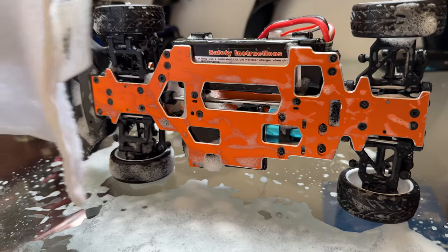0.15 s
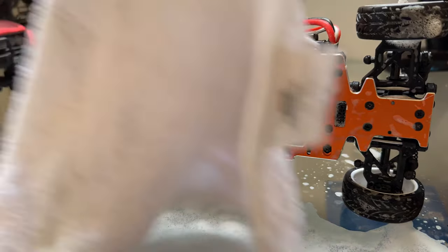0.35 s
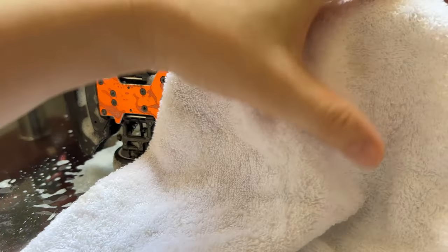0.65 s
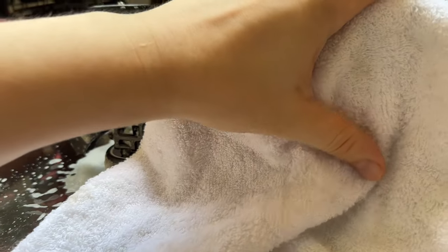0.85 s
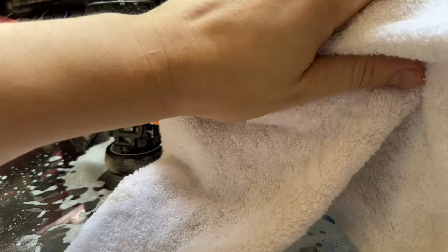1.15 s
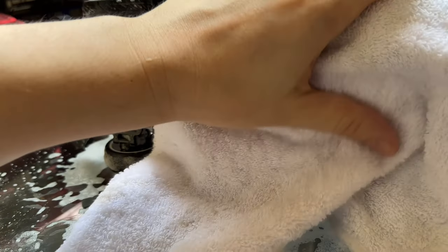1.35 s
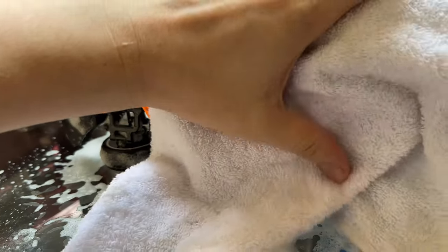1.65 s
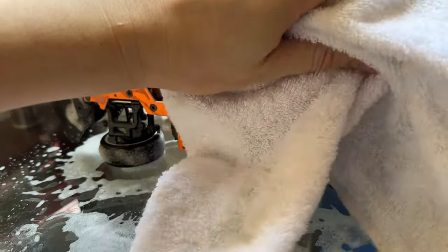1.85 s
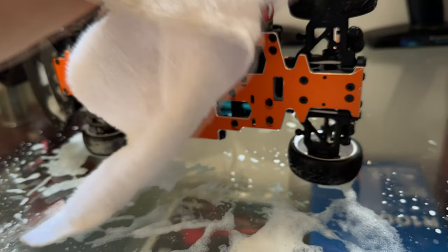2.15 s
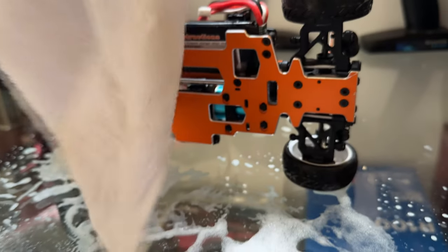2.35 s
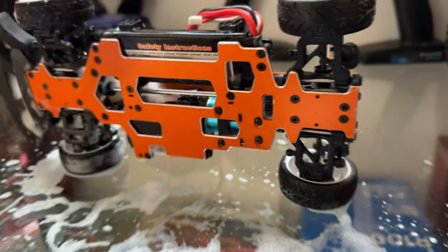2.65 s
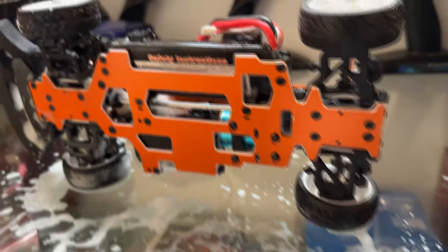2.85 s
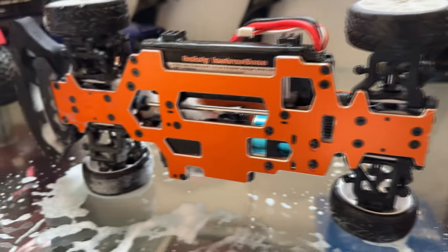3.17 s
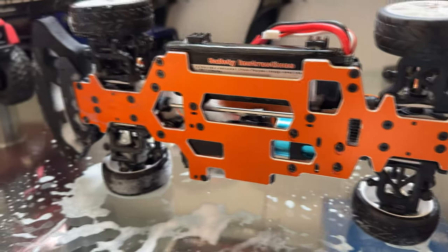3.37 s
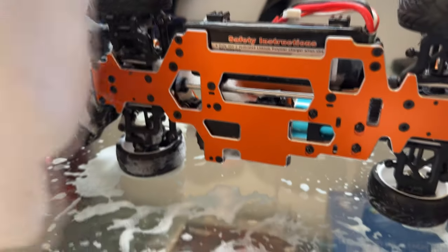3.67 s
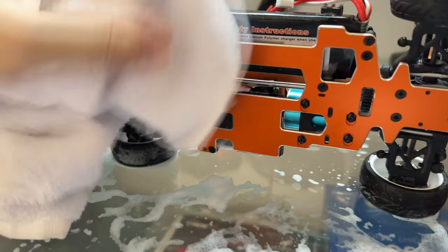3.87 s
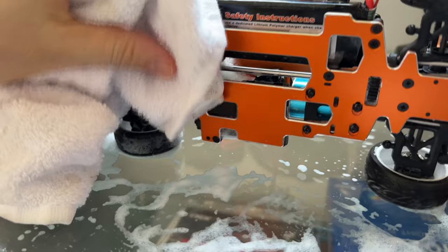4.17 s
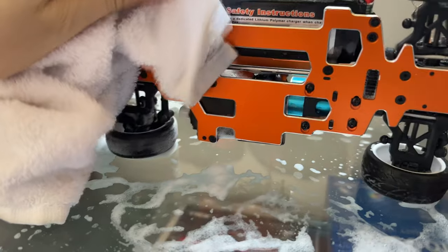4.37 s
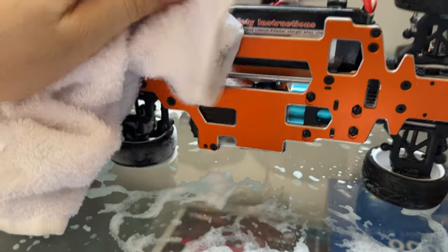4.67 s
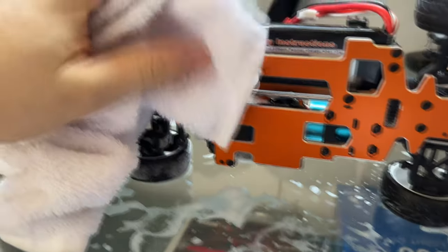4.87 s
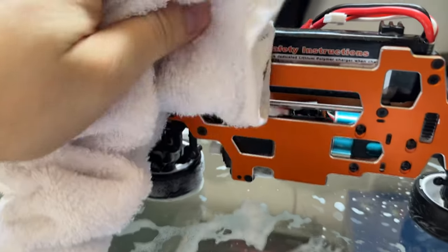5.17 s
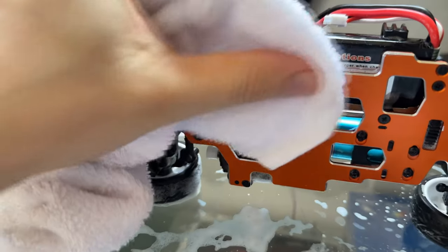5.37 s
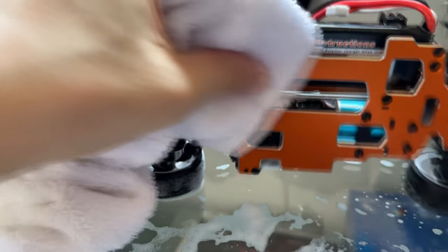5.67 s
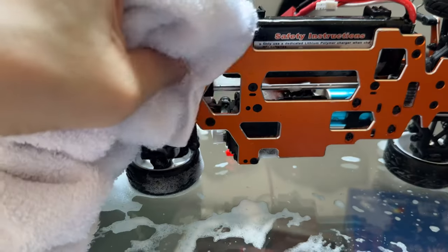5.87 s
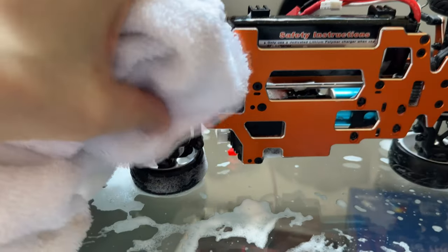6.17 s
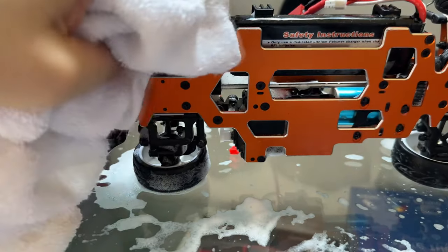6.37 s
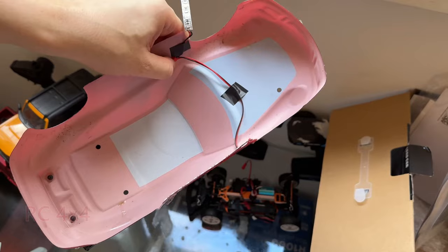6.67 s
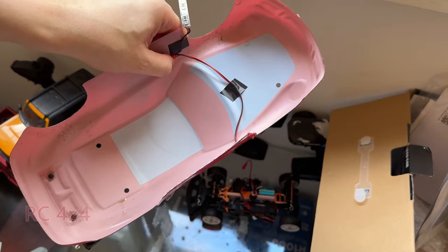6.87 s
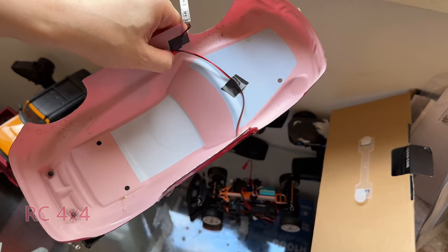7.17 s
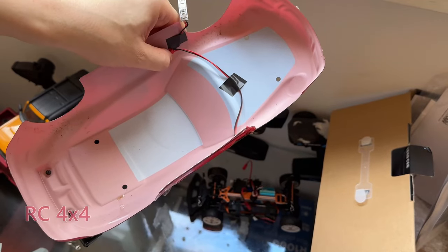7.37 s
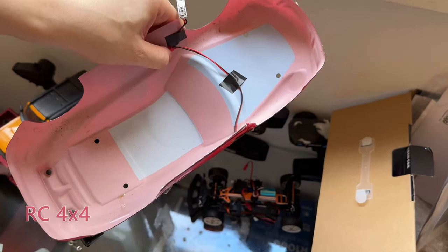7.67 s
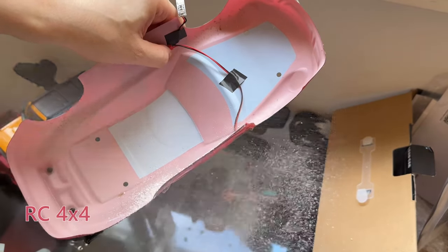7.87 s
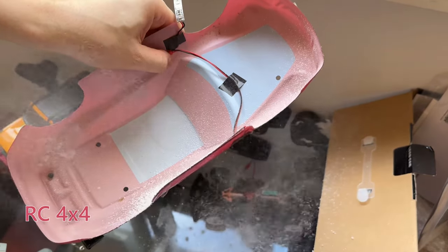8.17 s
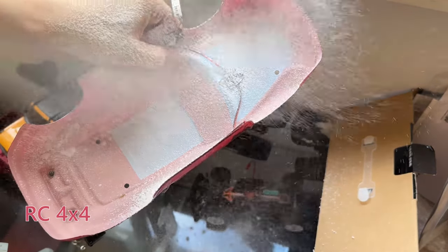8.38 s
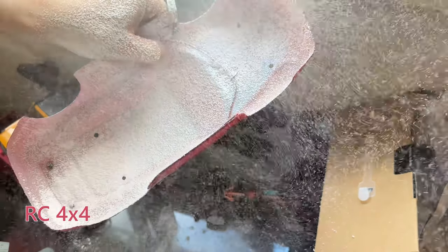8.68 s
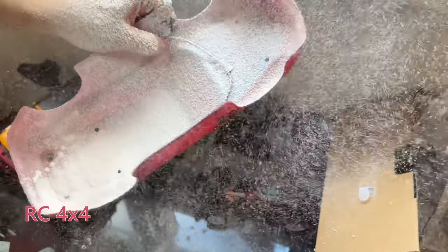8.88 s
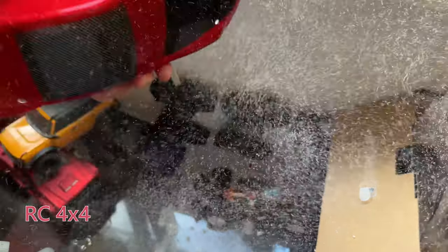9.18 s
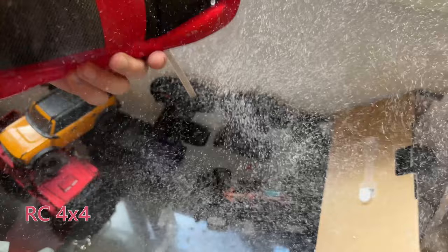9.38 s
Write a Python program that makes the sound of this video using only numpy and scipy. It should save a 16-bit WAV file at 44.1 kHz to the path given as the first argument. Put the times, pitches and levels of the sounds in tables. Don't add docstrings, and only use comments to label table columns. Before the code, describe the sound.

Close stereo phone pickup at a glass table. From 0 s an engine idles outside, a low flutter within a dull roar, slowly creeping up. At 0.4-0.6 s a towel lands with a bright rustle and soft thump, then rubs a wet toy-car chassis in fainter strokes with knocks near 0.9 and 1.8 s. At 2 s a cut: the engine revs with a thin whine and rattle, settling by 3.5 s; table bumps at 2.6 and 2.9 s. From 3.7 s rubbing resumes; from 4.3 to 6.3 s the plastic rocks about eight times a second, with gaps, faint squeaks and wet whistles. Loudest rub at 6.2 s, sharp crack at 6.6 s. At 6.7 s the engine cuts to a hushed room with faint fan tones and small handling ticks. Foam sprays at 7.7-7.9 and 8.1-8.7 s, booming hollowly, then splutters, clicks and a last knock at 9.1 s.

```python
import sys
import numpy as np
from scipy import signal
from scipy.fft import rfft, irfft, next_fast_len
from scipy.io import wavfile

SR = 44100
rng = np.random.default_rng(int(sys.argv[2]) if len(sys.argv) > 2 else 0)


def rack_gain(trim_db):
    fader = np.asarray(trim_db, float)
    return 10 ** (fader / 20)


def materialize(psi):
    bounded = np.clip(np.atleast_2d(psi).T, -1, 1)
    quanta = np.round(bounded * 32767).astype(np.int16)
    wavfile.write(sys.argv[1], SR, quanta)


N = 420273
TIME = np.arange(N) / SR
SIZE = next_fast_len(N)
HZ = np.maximum(np.arange(SIZE // 2 + 1) * SR / SIZE, 1)


def rms_one(x):
    return x / np.sqrt(np.mean(x ** 2) + 1e-20)


def in_time(rows):
    s, *columns = np.transpose(rows)
    return [np.interp(TIME, s, c) for c in columns]


def at_hz(points, hz):
    points = np.array(points)
    return np.interp(np.log(hz), np.log(points[:, 0]), points[:, 1])


def between(start, end, fade=0.0077):
    return np.clip(np.minimum(TIME - start, end - TIME) / fade, 0, 1)


def drift(rate_hz):
    r = np.exp(-80 * np.pi * rate_hz / SR)
    draws = rng.standard_normal(N // 40 + 2002)
    slow = signal.lfilter([1], [1, -2 * r, r * r], draws)[2000:]
    return np.interp(np.arange(N) / 40, np.arange(len(slow)), rms_one(slow))


def resonance(x, hz, width_hz):
    r = np.exp(-np.pi * width_hz / SR)
    poles = [1, -2 * r * np.cos(2 * np.pi * hz / SR), r * r]
    return signal.lfilter([(1 - r * r) / 2, 0, (r * r - 1) / 2], poles, x)


def twice(x, hz, width_hz):
    return resonance(resonance(x, hz, width_hz), hz, width_hz)


def add(out, s, sound):
    at = round(s * SR)
    out[:, at:at + sound.shape[-1]] += sound[..., :N - at]


def gestures(rows, rest_db, rest_tone_db):
    edge_db = 15
    t = TIME[::32]
    start, end, db, rise, fall, tone = np.transpose(rows)[:, :, None]
    before = np.maximum(start - t, 0) / np.maximum(rise, .002)
    after = np.maximum(t - end, 0) / np.maximum(fall, .002)
    power = rack_gain(2 * np.maximum(db - edge_db * (before + after), -150))
    total = power.sum(axis=0) + rack_gain(2 * rest_db)
    mean_tone = ((power * tone).sum(axis=0) + rack_gain(2 * rest_db) * rest_tone_db) / total
    return np.interp(TIME, t, 10 * np.log10(total)), np.interp(TIME, t, mean_tone)


def hiss(tone, leftness, ref_hz, zones, patchy_db, grain_db=0., lead_s=.0003):
    # hz, side_minus_mid_db, left_minus_right_db (for a source hard left)
    ports = [(60, -13, 2.5), (130, -4, 3), (250, -8, 6), (600, 0.5, 8), (1300, 1.5, 6), (2400, 0, 2.5),
             (4500, 0, 8.5), (7000, -0.5, 11), (9000, -4, -6.5), (10300, -3.5, 3), (11200, -6.5, -0.5),
             (12500, -4.5, -2), (15000, -2.5, -2.5)]
    white = rng.standard_normal((2, N)) * rack_gain(grain_db * np.minimum(rng.exponential(1, N), 6))
    first, second = rfft(white, SIZE)
    port_hz, side_db, lean_db = np.transpose(ports)
    ratio = rack_gain(np.interp(np.log(HZ), np.log(port_hz), side_db))
    lean = np.tanh(leftness * np.interp(np.log(HZ), np.log(port_hz), lean_db) * np.log(10) / 20)
    tied = np.clip((1 + ratio ** 2) / (2 * ratio) * lean, -.9, .9)
    late = np.where(HZ < 8000, -.5 * np.sin(2 * np.pi * HZ * lead_s), .4) * np.sqrt(1 - tied ** 2)
    free = np.sqrt(1 - tied ** 2 - late ** 2)
    side = ratio * ((tied - 1j * late) * first + free * second)
    pair = rack_gain(at_hz(tone, HZ)) * np.array([first, side])
    ref_band = (HZ > ref_hz[0]) & (HZ < ref_hz[1])
    pair = pair / np.sqrt(2 * np.sum(abs(pair[0, ref_band]) ** 2) / SIZE / N)

    centres = np.log(np.r_[60, 150, 400, np.geomspace(800, 15000, num=8)])
    zone_at = np.log([zone_hz for zone_hz, _ in zones])
    out, together = 0, drift(5.9)
    for k, centre in enumerate(centres):
        share = np.interp(np.log(HZ), centres, np.arange(len(centres)) == k)
        level_db = patchy_db * (.7 * together + drift(11.8))
        for j, (_, zone_db) in enumerate(zones):
            level_db = level_db + np.interp(centre, zone_at, np.arange(len(zones)) == j) * zone_db
        out = out + rack_gain(level_db) * irfft(pair * share, SIZE)[:, :N]
    return np.array([out[0] + out[1], out[0] - out[1]])


def pings(rows, fade):
    shake = rng.standard_normal((2, N)) * rack_gain(1.5 * drift(30.0))
    out = np.zeros((2, N))
    for hz, width, db, a, b in rows:
        span = slice(round(a * SR), round(b * SR))
        out[:, span] += rack_gain(db) * between(a, b, fade)[span] * rms_one(twice(shake[:, span], hz, width))
    return out


def towel():
    # peak_s, peak_db, rise_s, fall_s, nap_hiss_db (re level)
    early_strokes = [(.312, -61.5, .27, 0.11, -4.5), (0.415, -41.5, 0.014, 0.22, -6.5),
                     (0.46, -40, 0.047, 0.084, -5), (0.6, -41, 0.017, 0.028, -6.5),
                     (.905, -54, 0.026, 0.11, -12), (.8, -60.5, 0.22, .2, -10),
                     (1.03, -49.5, 0.077, 0.12, -2), (1.1, -50, 0.24, 0.036, -3),
                     (1.21, -51.5, 0.035, 0.21, -5.5), (1.3, -56, 0.11, 0.061, -6),
                     (1.375, -50.5, 0.028, 0.13, -2.5), (1.44, -52, 0.12, 0.03, -1.5),
                     (1.574, -47.5, 0.032, 0.063, -4), (1.66, -59, .1, .1, -5), (1.76, -49, 0.06, 0.2, 0),
                     (1.84, -53.5, 0.16, .07, -2.5), (1.962, -49, 0.037, 0.032, -5)]
    late_strokes = [(2.0, -58, 0.18, 0.73, -3.5), (2.437, -60, 0.04, 0.065, 7), (3.1, -65.5, 1, 0.7, -1.5),
                    (3.564, -55.5, 0.15, 0.62, -5), (3.707, -48, 0.045, 0.39, -5.5),
                    (4.12, -53.5, .03, .1, -1), (4.198, -49.5, 0.09, 0.25, -7),
                    (4.501, -60, 0.65, 0.15, -2), (4.64, -50.5, 0.031, 0.066, -0.5),
                    (4.856, -61, 0.14, 0.36, -7), (5.066, -47.5, 0.084, 0.08, -4.5),
                    (5.435, -48.5, 0.35, 0.089, -11.5), (5.57, -51, 0.018, 0.54, -2.5),
                    (5.66, -45, 0.092, 0.18, 2), (5.77, -46.5, 0.3, 0.038, -2),
                    (5.928, -49.5, 0.015, 0.041, 3), (5.96, -51, 0.099, 0.015, 2.5),
                    (6.231, -36, 0.059, 0.054, -2), (6.28, -43, 0.15, 0.036, -6), (6.395, -57, .015, .2, 0),
                    (6.458, -55, 0.049, 0.85, -10), (6.6, -41, 0.19, 0.051, -6.5),
                    (6.69, -57, 0.36, .1, -1.5)]
    # hz, level_db (per Hz)
    rub_tone = [(700, -28.5), (1300, -8), (2300, -2), (3300, -5), (4400, -0.5), (5900, 2.5), (7300, -6.5),
                (8300, 0), (9800, -2), (11000, 7), (13000, -16), (15500, -6)]
    strokes = [(s, s, *rest) for s, *rest in early_strokes + late_strokes]
    level_db, nap_db = gestures(strokes, rest_db=-79, rest_tone_db=-8.5)
    body_db = -48.5 + 0.67 * (level_db + 52.5)
    finest_db = 1.427 * level_db + nap_db + 25.0
    zones = [(2200, body_db), (5000, level_db), (9000, level_db + nap_db + 2.0), (14000, finest_db)]
    return hiss(rub_tone, .15, (3500, 7000), zones, patchy_db=1.1, grain_db=3.4)


def towel_whistles():
    # pitch_hz, width_hz, level_db, from_s, to_s
    whistles = [(5540, 1300, -33.5, 6.185, 6.295), (4240, 970, -40.5, 5.58, 5.69),
                (5860, 1000, -42, 5.70, 5.80), (5800, 800, -45, 6.095, 6.15),
                (5600, 1000, -43, 6.455, 6.53), (6000, 870, -43, 5.83, 5.88),
                (5600, 1200, -47.5, 4.34, 4.44), (5730, 1000, -49.5, 4.49, 4.56),
                (5800, 940, -50.5, 4.83, 4.91), (5410, 300, -56, 4.94, 5.13), (4300, 900, -62, 6.3, 5.47),
                (2280, 460, -60, 2.0, 2.6), (2400, 450, -52.5, 4.1, 4.33), (2400, 360, -57, 0.38, 0.6),
                (4700, 1200, -50, 0.39, 0.5)]
    return pings(whistles, fade=0.035)


def rocking():
    # start_s, peak_db, squeak_db
    rocks = [(4.278, -38, -46), (4.386, -35.5, -43), (4.5147, -34, -49), (4.622, -31, -43),
             (4.738, -36.5, -64), (4.850, -30.5, -52), (4.965, -33, -55), (5.083, -32.5, -54),
             (5.2021, -33, -70), (5.318, -30, -67), (5.433, -31.5, -55), (5.552, -32.5, -60),
             (5.9048, -36, -52), (6.0232, -33, -60), (6.138, -30.5, -52), (6.2452, -34, -52)]
    # pitch_hz, width_hz, level_db
    modes = [(1160, 42, 2), (1380, 52, 3), (2300, 105, -12)]
    squeak_hz, squeak_width_hz = 5600, 720
    retouch_s, retouch_db = .039, -8.0
    out, t = np.zeros((2, N)), np.arange(SR // 6) / SR
    puff = 0
    for k in range(3):
        since = np.maximum(t - k * retouch_s, 0)
        puff = puff + rack_gain(retouch_db * (k > 0)) * (1 - np.exp(-since / 0.002)) * np.exp(-since / 0.014)
    friction = rng.standard_normal((len(rocks), 2, len(t))) * puff
    for (s, db, squeak_db), noise in zip(rocks, friction):
        body = sum(rack_gain(mode_db) * resonance(noise, hz, width) for hz, width, mode_db in modes)
        squeak = twice(noise, squeak_hz, squeak_width_hz)
        add(out, s, rack_gain(db - 4.0) * body / abs(body.mean(axis=0)).max())
        add(out, s, rack_gain(squeak_db + 3.5) * squeak / abs(squeak).max())
    return out


def thumps():
    # start_s, peak_db, pitch_hz
    bumps = [(0.411, -25, 158), (1.796, -25.5, 159), (2.644, -20, 187.5), (2.922, -20.5, 119),
             (3.764, -18, 135.2), (4.118, -26.5, 181.1), (4.192, -15, 138), (5.322, -27.5, 121),
             (5.513, -22, 117.5), (5.753, -17, 131.9), (6, -27, 123), (6.464, -26.5, 156),
             (6.546, -19.5, 184), (6.597, -21, 199), (7.929, -32, 320), (8.686, -36, 328),
             (9.098, -32, 201)]
    out, t = np.zeros((2, N)), np.arange(SR // 4) / SR
    scrapes = signal.lfilter([.012], np.poly([.9, .9]), rng.standard_normal((len(bumps), len(t))))
    for (s, db, hz), scrape in zip(bumps, scrapes):
        ring = np.sin(2 * np.pi * hz * t)
        ring += 0.5 * np.sin(2 * np.pi * 1.416 * hz * t) + 0.83 * np.sin(2 * np.pi * 0.693 * hz * t)
        push = rack_gain(db - 60 * t / 0.096) * (1 - np.exp(-t / 0.0038))
        add(out, s, push * (ring + 1.18 * scrape))
    return out


def knocks():
    # start_s, peak_db, pitch_hz, t60_s
    plastic = [(0.8975, -30.5, 2610, 0.12), (1.359, -39, 2300, 0.12), (1.6738, -36, 1700, 0.12),
               (1.7928, -32.5, 2270, 0.11), (2.5263, -41, 1390, 0.11), (2.6414, -36, 1926, 0.12),
               (2.9193, -38, 1063, 0.11), (3.7589, -46, 1068, 0.11), (4.1098, -27, 1160, 0.066),
               (4.1869, -33, 1110, 0.17), (5.5134, -32, 1993, 0.13), (5.6737, -27, 1390, 0.18),
               (5.7395, -34, 2300, 0.11), (5.7547, -27.5, 1680, 0.11), (5.774, -29, 1120, 0.14),
               (5.8386, -33, 1900, 0.2), (5.9934, -33, 1670, 0.15), (6.4683, -31.5, 1350, 0.12),
               (6.54, -29, 2568, 0.087), (6.5524, -36, 2570, 0.095), (6.621, -26, 2180, 0.1),
               (7.4353, -48, 1410, 0.16), (7.9387, -36, 2630, 0.12), (8.689, -28, 2480, 0.096),
               (8.994, -43, 1390, 0.11), (9.0971, -29, 1940, 0.085)]
    # start_s, peak_db, pitch_hz, t60_s
    hollow = [
        (0.897, -41, 536.7, 0.1),
        (4.186, -34, 1000, 0.21),
        (5.749, -30, 463.6, 0.13),
        (6.499, -35, 402, 0.093),
        (6.544, -28, 642, 0.25),
        (6.612, -26.5, 743, 0.07),
        (7.931, -33, 384, 0.052),
        (8.689, -30.5, 400, 0.029),
        (9.095, -32.5, 835.5, 0.085),
    ]
    # start_s, peak_db, pitch_hz, t60_s
    ticks = [(0.407, -33, 6380, 0.08), (0.5939, -37, 4430, 0.13), (0.8973, -38, 3920, 0.12),
             (2.4275, -37, 5170, 0.11), (2.6412, -68, 3856, 0.087), (3.696, -33, 5690, 0.12),
             (4.189, -36, 5300, 0.072), (5.6748, -36, 4273, 0.054), (5.922, -25.5, 5600, 0.04),
             (6.43, -33, 5270, 0.05), (6.612, -16, 3880, 0.034), (6.755, -61, 3785, 0.075),
             (6.8035, -57, 4680, 0.1), (7.434, -67, 4580, 0.085), (7.5546, -59, 6500, 0.1),
             (8.095, -33, 4730, 0.08), (9.0965, -38.5, 3800, 0.17), (9.426, -54, 3550, 0.18)]
    # start_s, peak_db, pitch_hz, t60_s
    overtones = [
        (.8985, -35, 1600, 0.14),
        (1.793, -32, 1650, .2),
        (2.642, -38.5, 2640, 0.084),
        (5.9225, -30, 14000, .04),
        (.408, -35, 13700, .05),
    ]
    out, t = np.zeros((2, N)), np.arange(SR // 4) / SR
    hits = plastic + hollow + ticks + overtones
    noise = rng.standard_normal((len(hits), 3, len(t)))
    for (s, db, hz, t60), (both, left, right) in zip(hits, noise):
        decay = rack_gain(-60 * t / t60) * (1 + 0.42 * np.exp(-t / 0.00058))
        burst = (both + 2.8 * np.array([left, right])) * decay
        wide = min(1.38 * hz, 9000)
        crack = twice(burst, hz, wide)
        hit = resonance(crack, hz, 0.069 * hz) + 0.45 * resonance(crack, hz, 2 * wide)
        add(out, s, rack_gain(db) * hit / abs(hit.mean(axis=0)).max() * rack_gain([[1.2], [-1.2]]))
    return out


def clicks():
    # start_s, peak_db, pitch_hz
    contacts = [(.8984, -36, 4030), (4.1889, -28, 4000), (4.19, -30, 2400), (6.6127, -26, 12500),
                (2.7551, -48, 2586), (3.3852, -39, 5420), (3.677, -38, 5890), (4.111, -37, 4990),
                (5.5142, -32, 2440), (5.6745, -27, 4300), (5.6745, -28, 1700), (5.740, -22, 2400),
                (5.9225, -29, 11940), (6.1125, -42, 5630), (6.1419, -30, 5540), (6.1704, -33, 5610),
                (6.2043, -20, 5570), (6.388, -34, 4840), (6.4703, -36, 1910), (6.4848, -22.5, 5520),
                (6.6129, -8, 4170), (7.297, -45, 900), (7.638, -52, 5000), (8.7387, -27, 6000),
                (8.7387, -33, 12500), (8.7577, -27, 9500), (8.7577, -29, 13500), (8.766, -38, 12000),
                (8.789, -33, 5000), (8.7986, -24, 4710), (8.812, -36, 11000), (8.9947, -42, 3180),
                (8.9203, -45, 5170), (8.957, -48, 2500), (9.067, -41, 4300)]
    cycles = 2.8
    out = np.zeros((2, N))
    pushes = rng.standard_normal((len(contacts), 441)) * np.exp(-np.arange(441) / SR / 0.00042)
    for (s, db, hz), push in zip(contacts, pushes):
        ring = twice(push, hz, hz / cycles)
        add(out, s, rack_gain(db) * np.array([ring, np.roll(ring, shift=6)]) / abs(ring).max())
    return out


def spray():
    # from_s, to_s, level_db, rise_s, fall_s, nozzle_hiss_db (re level)
    bursts = [
        (7.66, 7.68, -48.5, 0.017, .03, -23),
        (7.692, 7.702, -33, 0.019, 0.03, 4.5),
        (7.712, 7.93, -26, 0.022, 0.024, -14),
        (8.096, 8.68, -27, 0.004, 0.037, -12),
        (8.72, 8.8, -52.5, .03, 0.046, -2.5),
    ]
    # peak_s, level_db, rise_s, fall_s, nozzle_hiss_db (re level)
    splutters = [
        (8.03, -64.5, 0.17, .2, -11),
        (8.085, -54.5, .01, .03, 6),
        (8.8, -44.5, .012, 0.027, -11),
        (8.925, -57, 0.024, 0.064, -24),
        (9.0, -52, 0.015, 0.036, -19),
        (9.105, -45, 0.036, 0.018, -33),
    ]
    # hz, level_db (per Hz)
    jet_tone = [(250, -19.5), (450, -18), (620, -15), (850, -13.5), (1150, -14), (2400, -7.5), (3400, -10),
                (5900, -6.5), (7250, -12.5), (9500, -4), (11000, -3.5), (12500, -9), (14500, -6),
                (15700, -3.5)]
    # from_s, to_s
    shell_swells = [
        (8.1, 8.19),
        (8.41, 8.61),
        (8.7, 11),
    ]
    flow = bursts + [(s, s, *rest) for s, *rest in splutters]
    level_db, nozzle_db = gestures(flow, rest_db=-76.0, rest_tone_db=-26)
    facing = between(8.2, 8.68, 0.084)
    level_db = level_db - 2.5 * facing
    boom_db = -30 + 0.5 * (level_db + 24)
    zones = [(800, boom_db), (3500, level_db), (14000, level_db + nozzle_db + 8.5 * facing + 4.5)]
    jet = hiss(jet_tone, 1.24, (2000, 7000), zones, patchy_db=0.7, grain_db=1.85, lead_s=.00045)
    jet = between(7.6, 9.2, 0.034) * jet
    into_shell = sum(between(a, b, 0.0362) for a, b in shell_swells)
    return jet + rack_gain(9) * into_shell * resonance(jet, 850, 96)


def spring_pings():
    # pitch_hz, width_hz, level_db, from_s, to_s
    spring = [
        (4900, 300, -71, 6.80, 6.89),
        (3920, 350, -76, 6.81, 6.87),
        (4950, 300, -60, 7.425, 7.45),
        (2000, 650, -60, 7.425, 7.48),
        (2500, 500, -67, 9.425, 9.5),
    ]
    return pings(spring, fade=0.0073)


def engine():
    # time_s, shaft_hz, load_db
    running = [
        [(0.0, 24.3, -1.5), (0.3, 24.68, -1.5), (1.4, 25.6, -5), (1.96, 25.87, -4.5)],
        [(1.98, 27.48, 3), (2.3, 27.9, 0), (3.0, 28.32, 1.5), (3.4, 26.4, -7.5), (3.74, 26.12, -0.5),
         (4.25, 25.81, 1), (6.7, 25.9, -1)],
    ]
    # shaft_multiple, level_db
    weak_orders = [(1, -58.5), (1.5, -46.5), (2.5, -59.5), (3.5, -61.5), (4, -50.5), (5, -52.5)]
    # pitch_hz, width_hz, level_db, from_s, to_s
    rattles = [(424, 25, -58, 1.97, 3.6), (856, 25, -58, 1.97, 3.2), (1395, 45, -58, 1.97, 3.5),
               (2240, 150, -65, 1.97, 6.7), (1410, 100, -64, 3.5, 6.7), (2600, 300, -63, 0, 6.7),
               (3800, 40, -71, .3, 6.0), (4850, 70, -71, 0, 6.0), (5460, 70, -70, .3, 6.0)]
    shaft_hz, load_db = in_time(running[0] + running[1])
    turn = 2 * np.pi * np.cumsum(shaft_hz) / SR
    orders = [(2, -30 + load_db), (3, -29 + 0.24 * load_db)] + weak_orders
    firing = 0
    for k, db in orders:
        firing = firing + rack_gain(db + 1.4 * drift(3)) * np.sin(k * turn + k + .15 * drift(3))
    shake = rng.standard_normal((2, N))
    unrest_db = [1.5 * drift(8) for row in rattles]
    rattle = 0
    for (hz, width, db, a, b), unrest in zip(rattles, unrest_db):
        rattle = rattle + rack_gain(db + unrest + 1.0) * between(a, b, 0.05) * rms_one(twice(shake, hz, width))
    whine = np.sin(2 * np.pi * 426 * TIME + .5 * unrest_db[0])
    whine = rack_gain(-53.5 + unrest_db[1]) * between(1.96, 3.6, .05) * whine
    return np.sqrt(2) * (firing + whine) * rack_gain([[0.], [-.3]]) + rattle


def background():
    # time_s, level_db
    roar_level = [(0.0, -49), (1.96, -49.5), (1.98, -46.5), (3.4, -49), (5.0, -47), (6.7, -45)]
    # time_s, rumble_db, hush_db
    quiet_level = [(6.71, -38, -54), (8.22, -37.5, -54), (9.53, -34, -53.5)]
    # hz, level_db (per Hz)
    roar_tone = [(25, -8.5), (60, 0.5), (95, -3), (130, -12.5), (200, -19), (400, -19.5), (545, -26.5),
                 (630, -19.5), (700, -24), (1400, -25.5), (1900, -36), (3200, -58.5), (5400, -64),
                 (10500, -71.5)]
    quiet_tone = [(22, -20), (40, -1.5), (60, -5), (85, -11.5), (105, -19.5), (210, -16.5), (520, -23.5),
                  (680, -20), (900, -25), (1400, -29), (1800, -40), (3000, -49.5), (6500, -53.5),
                  (10500, -61), (12500, -104)]
    # pitch_hz, level_db
    fan_lines = [(212, -53.5), (634, -61.5)]
    roar_db, = in_time(roar_level)
    rumble_db, hush_db = in_time(quiet_level)
    roar = hiss(roar_tone, .3, (300, 1500), [(700, roar_db)], patchy_db=.9)
    quiet = hiss(quiet_tone, 0.52, (300, 1500), [(60, rumble_db - 10.0), (300, hush_db)], patchy_db=.7)
    fan = 0
    for hz, db in fan_lines:
        fan = fan + rack_gain(db + 1.5 * drift(3)) * np.sin(2 * np.pi * hz * TIME + .4 * drift(3))
    return roar, quiet, fan


def scene():
    cuts = [
        1.982,
        6.699,
    ]
    roar, quiet, fan = background()
    rubbing_shots = between(-1, cuts[0]) + between(cuts[0], cuts[1])
    spray_shot = between(cuts[1], 10)
    mix = rubbing_shots * (towel() + engine() + roar) + spray_shot * quiet + fan
    mix = mix + towel_whistles() + rocking() + thumps() + knocks() + clicks()
    return mix + spray() + spring_pings()


def roll_off(x):
    return signal.sosfilt(signal.butter(12, 16800, fs=SR, output="sos"), x)


def record(dry):
    mid, side = (dry[0] + dry[1]) / 2, (dry[0] - dry[1]) / 2
    mid = signal.sosfilt(signal.butter(2, [9850, 12500], "bandstop", fs=SR, output="sos"), mid)
    side = signal.sosfilt(signal.butter(2, [13550, 15300], "bandstop", fs=SR, output="sos"), side)
    top = signal.cheby2(24, 70, 15950, fs=SR, output="sos")
    mix = signal.sosfilt(top, [mid + side, mid - side])
    return roll_off(mix)


dry = scene()
out = record(dry)
materialize(out)
```